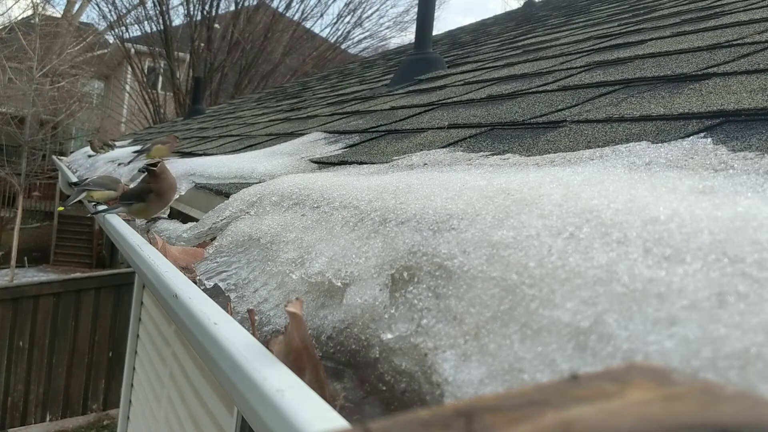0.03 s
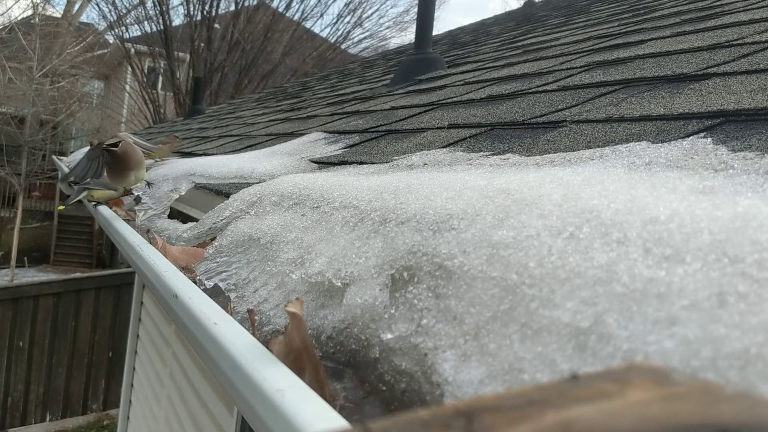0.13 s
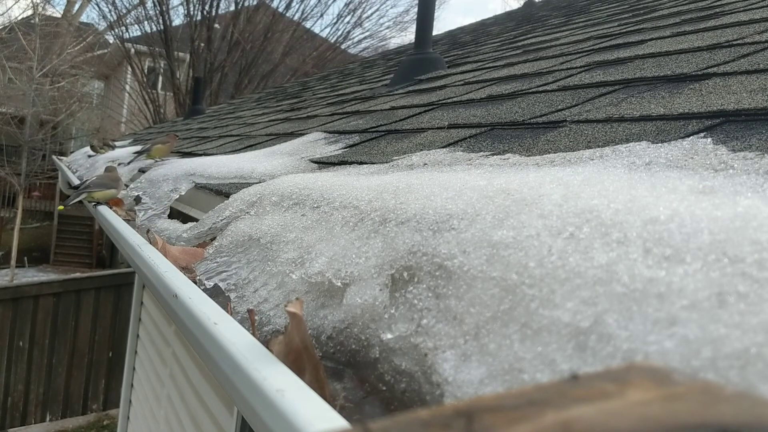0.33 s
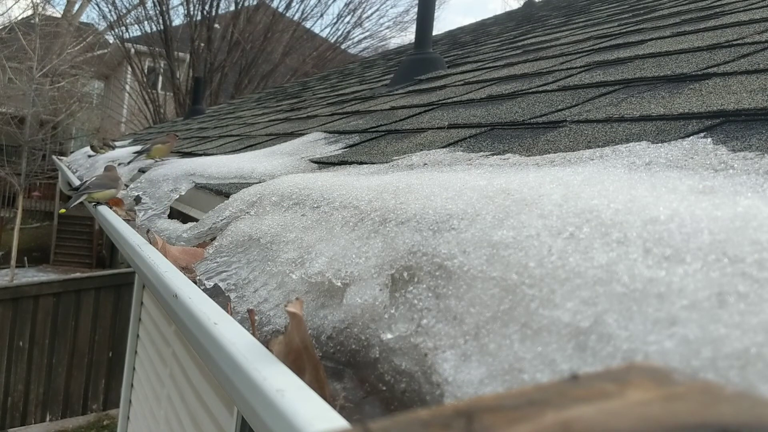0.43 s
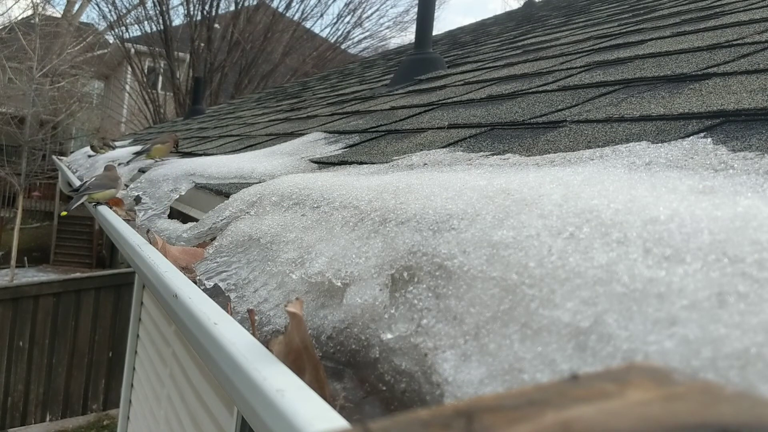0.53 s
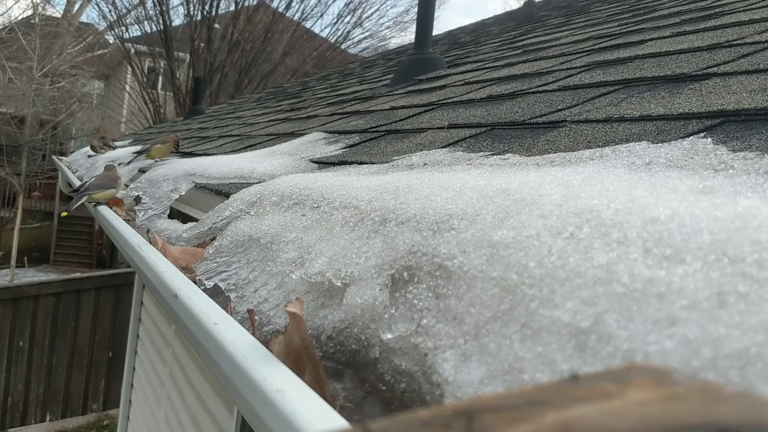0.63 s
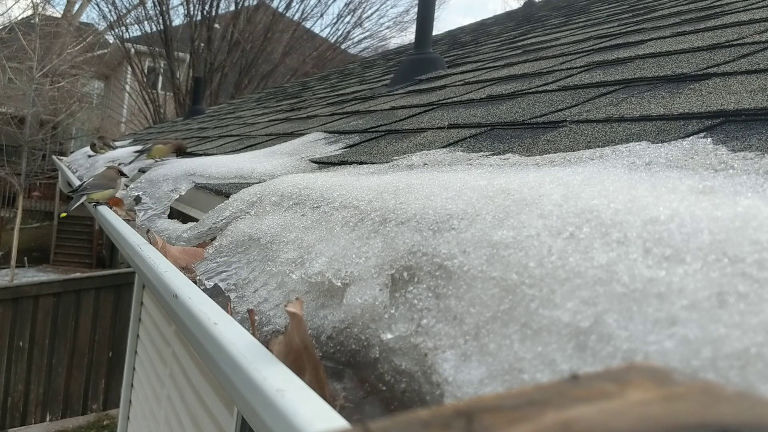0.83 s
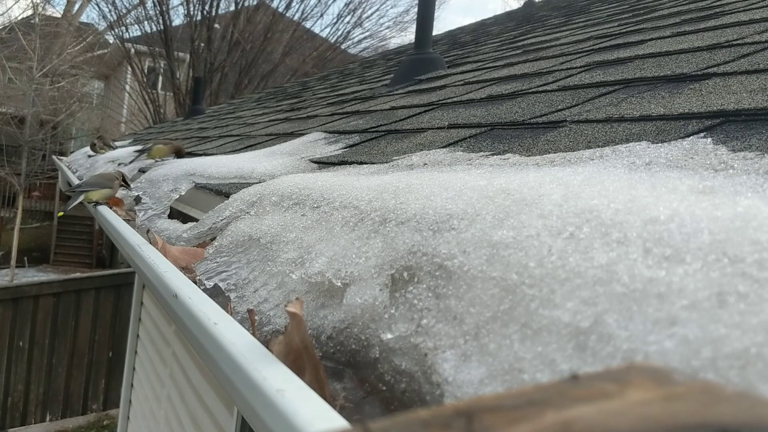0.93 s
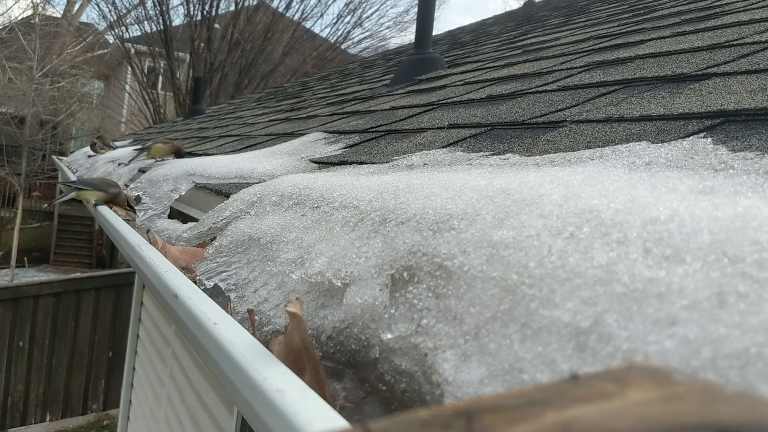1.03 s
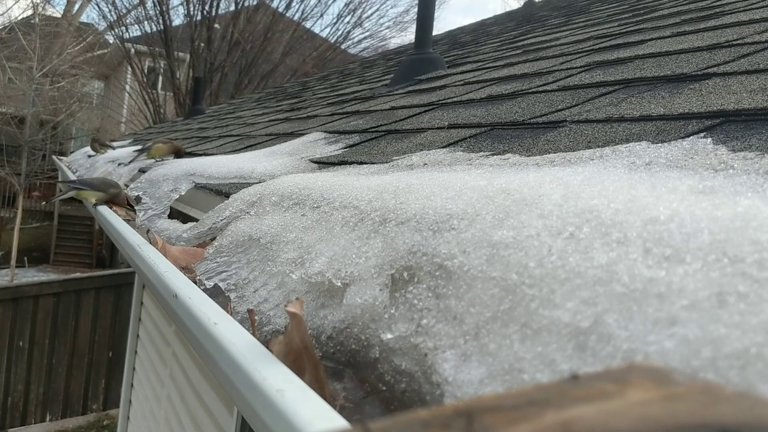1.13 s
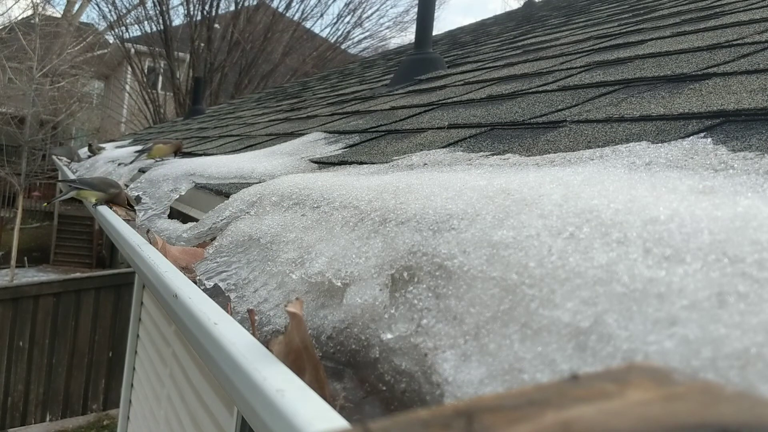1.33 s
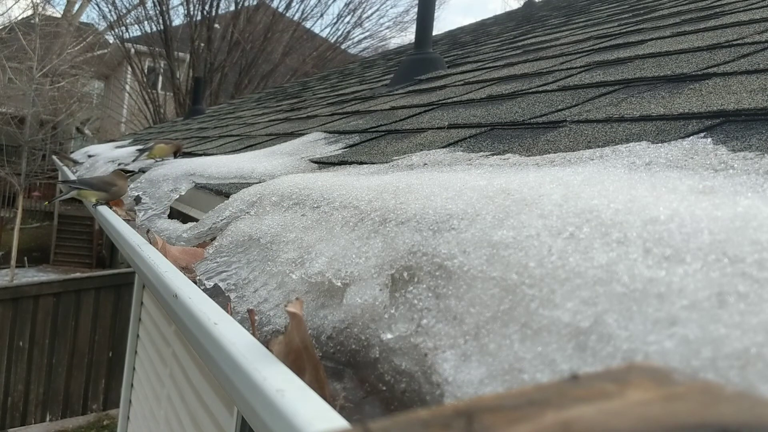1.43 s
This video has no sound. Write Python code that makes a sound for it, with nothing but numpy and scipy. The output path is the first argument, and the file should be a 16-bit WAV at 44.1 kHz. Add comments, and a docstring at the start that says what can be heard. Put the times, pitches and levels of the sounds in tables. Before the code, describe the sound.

A waxwing close by gives a very high, thin, quick trill, then its wings flutter away with light gutter ticks; soft chirps follow, over faint distant songbirds and low outdoor rumble in an open yard.

```python
"""Far songbirds whistle over a low outdoor rumble; then a waxwing flies off a snowy roof gutter with a high trill.
The trill is one near-sine thrown into quick arches, high and low in turn; a second bird adds softer notes.
Wings flutter away as coloured noise swelling at each stroke. The gutter gives light ticks (decaying noise)
and soft bumps (decaying low sines). Far birds are bent sines; rumble and hiss are noise with a faint hum."""
import sys
import numpy as np
from scipy import signal
from scipy.fft import rfft, irfft
from scipy.io import wavfile

SR = 44100
rng = np.random.default_rng(int(sys.argv[2]) if len(sys.argv) > 2 else 0)


def int16_out(signal):
    """Quantize to a 16-bit WAV file."""
    q = np.round(np.clip(np.atleast_2d(signal).T, -1, 1) * 32767)
    wavfile.write(sys.argv[1], SR, q.astype(np.int16))


N = 66150
TIME = np.arange(N) / SR


def from_db(db):
    """Decibels to amplitude gain."""
    return 10 ** (np.asarray(db) / 20)


def drift(rate_hz):
    """Smooth random wander of spread 1: white noise through two equal one-pole low-passes."""
    pole = np.exp(-2 * np.pi * rate_hz / SR)
    white = rng.standard_normal(2 * N)
    slow = signal.lfilter([1], [1, -2 * pole, pole * pole], white)[N:]  # first half settles the filter
    return slow / slow.std()


def noise(spectrum):
    """Noise of rms 1, coloured by a relative spectrum of (freq_hz, density_db)."""
    freq_hz, density_db = np.transpose(spectrum)
    bin_hz = np.arange(N // 2 + 1) * SR / N + 1  # +1 avoids log(0)
    gain = from_db(np.interp(np.log(bin_hz), np.log(freq_hz), density_db))
    gain *= np.minimum(bin_hz / freq_hz[0], 1) ** 2  # roll-off below the first point
    x = irfft(rfft(rng.standard_normal(N)) * gain, N)
    return x / x.std()


def swell(at_s, width_s):
    """Gaussian rise and fall, peak 1."""
    return np.exp(-.5 * ((TIME - at_s) / width_s) ** 2)


def yard(x, wet_db, t60_s):
    """Direct sound plus a diffuse decaying tail and a few near echoes off roof and walls."""
    # columns: delay_s, level_db
    echoes = [(.0042, -33), (0.0091, -24), (0.02, -23), (.031, -29)]
    response = rng.standard_normal(N) * from_db(-60 * TIME / t60_s)
    response *= from_db(wet_db) / np.linalg.norm(response)
    for delay_s, level_db in echoes:
        response[int(delay_s * SR)] += from_db(level_db)
    return x + signal.fftconvolve(x, response)[:N]


def background():
    """Outdoor rumble and hiss as shaped noise, with a faint wavering hum that comes up."""
    # columns: freq_hz, density_db (relative)
    air_spectrum = [(25, -31), (40, -6.5), (62, 3), (100, -3), (160, -8.5), (240, -10.5), (400, -15.5),
                    (800, -21), (1700, -25.5), (2600, -24), (4600, -30), (6300, -27.5), (7400, -30),
                    (8000, -38), (11000, -38), (15500, -40.5)]
    # columns: time_s, level_db
    hum_level = [(0, -70.5), (.5, -70), (.62, -66), (1.5, -63.5)]
    air_db, hum_hz, hum_waver = -62.5, 127, 0.025  # waver: share of pitch
    hum_pitch_hz = hum_hz * (1 + hum_waver * drift(7.7))
    hum = np.sin(2 * np.pi * np.cumsum(hum_pitch_hz) / SR)
    hum_gain = from_db(np.interp(TIME, *np.transpose(hum_level)))
    return from_db(air_db) * noise(air_spectrum) + hum_gain * hum


def far_birds():
    """Short sine whistles of far songbirds, each bent through three pitches with a fast random waver."""
    # columns: start_s, length_s, first_hz, middle_hz, last_hz, level_db
    far_notes = [(0, .05, 3850, 4400, 4150, -66.5), (.162, .048, 4480, 4523, 4470, -71.5),
                 (.205, 0.093, 3665, 3690, 3655, -72), (0.322, .04, 2173, 2430, 2660, -69.5),
                 (0.618, 0.12, 3553, 3640, 3540, -76), (0.729, 0.034, 2820, 2740, 2660, -71),
                 (0.751, 0.098, 3600, 3565, 3560, -76), (0.869, 0.039, 3620, 3420, 3400, -70.5),
                 (0.915, 0.038, 3380, 3100, 2580, -71), (0.968, 0.013, 2790, 2920, 3100, -72),
                 (.992, .032, 4300, 3830, 3340, -73), (.992, .062, 2570, 2435, 2196, -73.5),
                 (1.06, .08, 5840, 5180, 4970, -74.5), (1.112, 0.014, 3445, 3430, 3450, -71),
                 (1.169, 0.021, 1620, 1580, 1540, -72.5), (1.427, 0.029, 2400, 2466, 2417, -74.5),
                 (1.482, 0.031, 5260, 5050, 4950, -64)]
    out = np.zeros(N)
    waver = 1 + .014 * drift(121.6)
    for start_s, length_s, first_hz, middle_hz, last_hz, level_db in far_notes:
        u = np.clip((TIME - start_s) / length_s, 0, 1)
        pitch_hz = np.interp(u, [0, .5, 1], [first_hz, middle_hz, last_hz]) * waver
        envelope = np.sqrt(np.abs(np.sin(np.pi * u)))
        out += from_db(level_db) * envelope * np.sin(2 * np.pi * np.cumsum(pitch_hz) / SR)
    return out


def gutter():
    """Dry ticks as noise with instant onset and exponential decay; soft bumps as decaying low sines."""
    # columns: start_s, level_db, decay_s (time constant)
    ticks = [(.427, -53.5, .0016), (.479, -52, .0011), (.528, -52, .0011), (.562, -57, .001),
             (1.0235, -56, .0011), (1.0546, -48.5, .0009), (1.456, -49, .0006)]
    # columns: freq_hz, density_db (relative)
    tick_spectrum = [(800, -12), (3000, 15.5), (6300, 24.5), (8000, 15), (11000, -18), (15000, -35)]
    # columns: start_s, pitch_hz, level_db, t60_s
    bumps = [(0.987, 130.4, -49, 0.21), (1.025, 215.4, -56.5, 0.18)]
    tick_envelope = np.zeros(N)
    for start_s, level_db, decay_s in ticks:
        decay = np.exp(-np.abs(TIME - start_s) / decay_s)
        tick_envelope += from_db(level_db) * (TIME >= start_s) * decay
    out = tick_envelope * noise(tick_spectrum)
    for start_s, pitch_hz, level_db, t60_s in bumps:
        t = np.maximum(TIME - start_s, 0)
        out += from_db(level_db - 60 * t / t60_s) * np.sin(2 * np.pi * pitch_hz * t)
    return out


def wings():
    """Noise swish per stroke, a crackly feather rustle pulsing with the strokes, and low gusts of air."""
    # columns: peak_s, level_db
    strokes = [(0.27, -72), (0.326, -64.5), (0.379, -65.5), (0.426, -62.5), (0.476, -62.5), (0.525, -64),
               (0.572, -64.5), (0.626, -66), (.669, -69.5), (1.027, -64.5), (1.443, -68.5)]
    # columns: peak_s, width_s, level_db
    gusts = [(0.091, 0.0072, -67), (0.288, 0.028, -61.5), (.37, 0.045, -61), (0.561, 0.021, -60.5),
             (0.639, 0.035, -59), (1.14, 0.016, -62.5), (1.26, 0.029, -62.5)]
    # spectra of swish, rustle and gusts; columns: freq_hz, density_db (relative)
    swish_spectrum = [(200, 9.5), (500, 2.5), (1500, -0.5), (2500, -7), (6000, -5), (9000, -16),
                      (15000, -33)]
    feather_spectrum = [(800, -8.5), (2500, -7), (4000, -5.5), (6200, 3.5), (8000, -13.5), (11000, -17),
                        (15000, -27)]
    gust_spectrum = [(25, -27), (60, 8.5), (110, 2), (200, -4), (500, -34), (2000, -60)]
    stroke_width_s = 0.006
    rustle_db, rustle_at_s, rustle_width_s = -70, 0.44, 0.21  # level before the beat factor
    steady_rustle, stroke_rustle = 1.5, 0.69  # gain between strokes, extra gain at each
    crackle_db, crackle_hz = 3.5, 130  # feathers brush unevenly

    swish_gain = sum(from_db(level_db) * swell(peak_s, stroke_width_s) for peak_s, level_db in strokes)
    swish = swish_gain * noise(swish_spectrum)

    beat = steady_rustle + stroke_rustle * sum(swell(peak_s, stroke_width_s) for peak_s, _ in strokes)
    feathers = noise(feather_spectrum) * from_db(crackle_db * drift(crackle_hz))
    feathers /= feathers.std()
    rustle = from_db(rustle_db) * beat * swell(rustle_at_s, rustle_width_s) * feathers

    gust_gain = sum(from_db(level_db) * swell(peak_s, width_s) for peak_s, width_s, level_db in gusts)
    return swish + rustle + gust_gain * noise(gust_spectrum)


def whistle(arches, rise_curve, fall_curve, weaker_db_per_khz):
    """Near-sine voice gliding first-top-last in each arch; it weakens at low pitch and can sag in level."""
    full_voice_hz = 6846  # weakens below this
    octave_db, fade_s = -49, 0.0027
    sag_width = 0.38  # share of half an arch
    out = np.zeros(N)
    jitter = 1 + 0.0008 * drift(160)
    flutter_db = 0.6 * drift(53)
    for start_s, length_s, first_hz, top_hz, last_hz, level_db, sag_db, sag_at in arches:
        on = (TIME >= start_s) & (TIME < start_s + length_s)
        t = TIME[on] - start_s
        u = 2 * t / length_s - 1  # -1 start, 0 top, 1 end
        rise_hz = (top_hz - first_hz) * np.maximum(-u, 0) ** rise_curve
        fall_hz = (top_hz - last_hz) * np.maximum(u, 0) ** fall_curve
        pitch_hz = (top_hz - rise_hz - fall_hz) * jitter[on]
        fade = np.sin(np.pi / 2 * np.clip(np.minimum(t, length_s - t) / fade_s, 0, 1))
        below_khz = np.maximum(full_voice_hz - pitch_hz, 0) / 1000
        sag = sag_db * np.exp(-.5 * ((u - sag_at) / sag_width) ** 2)
        voice_db = level_db + flutter_db[on] - weaker_db_per_khz * below_khz - sag
        phase = 2 * np.pi * np.cumsum(pitch_hz) / SR
        tone = np.sin(phase) + from_db(octave_db) * np.sin(2 * phase)
        out[on] += fade * from_db(voice_db) * tone
    return out


def soft_notes():
    """Second bird: quiet notes that glide more evenly and weaken less at low pitch."""
    # columns: start_s, length_s, first_hz, top_hz, last_hz, level_db, sag_db, sag_at (-1 start to 1 end)
    soft_arches = [(.146, .026, 4600, 6400, 7200, -63, 6, .3),
                   (.786, .012, 6700, 7450, 6900, -68.5, 3.5, 0), (.806, .012, 6670, 7050, 6700, -70, 4, 0),
                   (.828, .014, 6960, 7300, 7060, -72, 4, 0), (.848, .011, 6700, 7200, 6800, -70, 4, 0),
                   (.867, .007, 6700, 5850, 5100, -63.5, 0, 0), (1.178, .014, 6700, 7170, 6900, -68, 2, 0),
                   (1.215, .014, 6600, 7130, 7460, -67, 0, 0),
                   (1.381, .0045, 5300, 5400, 5200, -56.5, 0, 0),
                   (1.3868, .0125, 5500, 7020, 7100, -50.3, 7, .9),
                   (1.4005, .0135, 6700, 7250, 7150, -56, 6, -.1),
                   (1.4145, .0058, 7300, 6100, 5100, -44.3, 12, -.7),
                   (1.4205, .0045, 6300, 5600, 5200, -56, 0, 0),
                   (1.4283, .011, 6700, 7200, 7550, -57.5, 4, .1)]
    return whistle(soft_arches, rise_curve=1.5, fall_curve=1.5, weaker_db_per_khz=3)


def trill():
    """Waxwing trill: a run of quick arches on one voice that eases in."""
    # columns: start_s, length_s, first_hz, top_hz, last_hz, level_db (before trill_db), sag_db,
    # sag_at (-1 start to 1 end)
    trill_arches = [(.2205, .0172, 5500, 6730, 4400, -24.6, 3, -.5),
                    (.2414, .0158, 5700, 7470, 6100, -27.6, 3, .1),
                    (.2565, .0205, 6200, 6940, 4700, -27, 6, -.1),
                    (.2785, .0172, 5800, 7460, 6200, -29.2, 6, .5),
                    (.295, .0198, 6000, 7120, 4600, -28.9, 0, 0),
                    (.3168, .0168, 6100, 7300, 6300, -33.5, 12, .1),
                    (.3322, .0212, 5600, 6850, 5000, -28, 28, -.1),
                    (.354, .0188, 5300, 7300, 6300, -30.5, 15, .2),
                    (.372, .0198, 6000, 6930, 4600, -31.2, 3, -.3),
                    (.3922, .0178, 5500, 7500, 6000, -35.5, 4, 0),
                    (.4075, .0145, 5400, 6850, 6200, -33, 9, .7)]
    trill_db, onset_at_s, onset_s = -2.2, 0.2262, 0.0012
    ease_in = .5 + .5 * np.tanh(.5 * (TIME - onset_at_s) / onset_s)
    voice = whistle(trill_arches, rise_curve=3.3, fall_curve=2.38, weaker_db_per_khz=9.5)
    return from_db(trill_db) * ease_in * voice


def scene():
    """Near birds and gutter in the yard, far birds with more echo, dry wings and background."""
    near = yard(trill() + soft_notes() + gutter(), wet_db=-14, t60_s=0.27)
    far = yard(far_birds(), wet_db=1, t60_s=0.29)
    return (near + far + wings() + background())[None]


def record(dry):
    """Steep elliptic low-pass on the top treble."""
    cutoff_hz, ripple_db, stop_db = 15750, .1, 70
    low_pass = signal.ellip(12, ripple_db, stop_db, cutoff_hz, fs=SR, output="sos")
    return signal.sosfilt(low_pass, dry)


dry = scene()
out = record(dry)
int16_out(out)
```